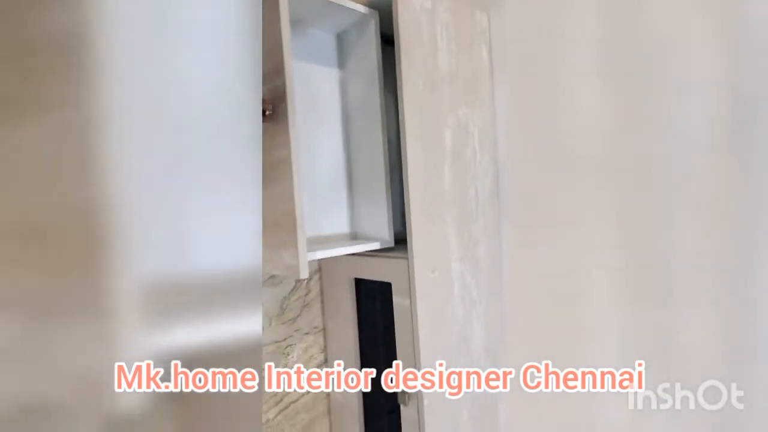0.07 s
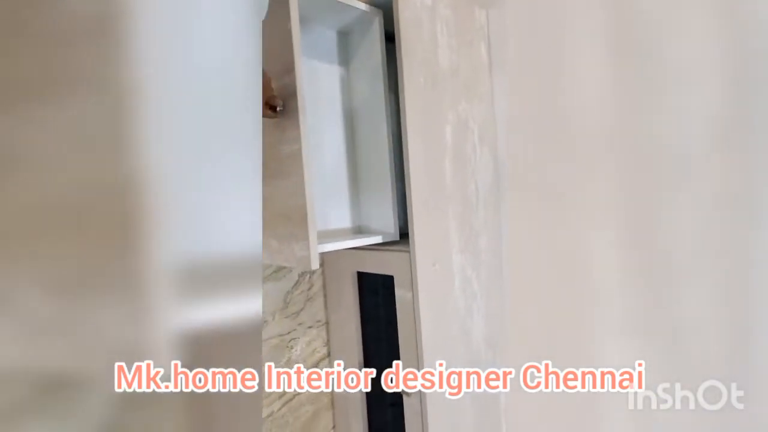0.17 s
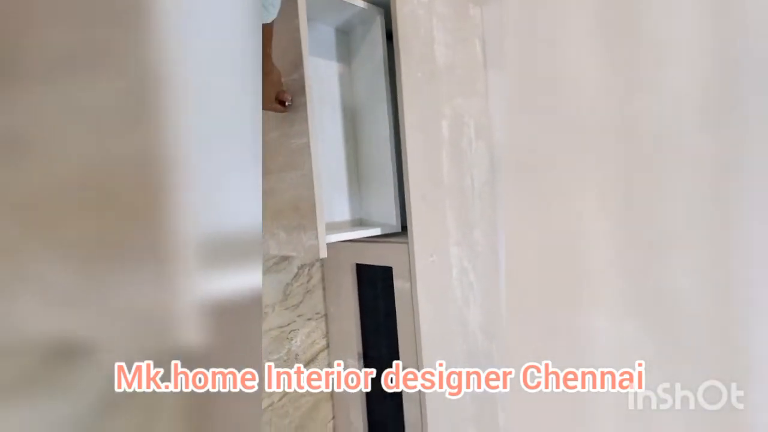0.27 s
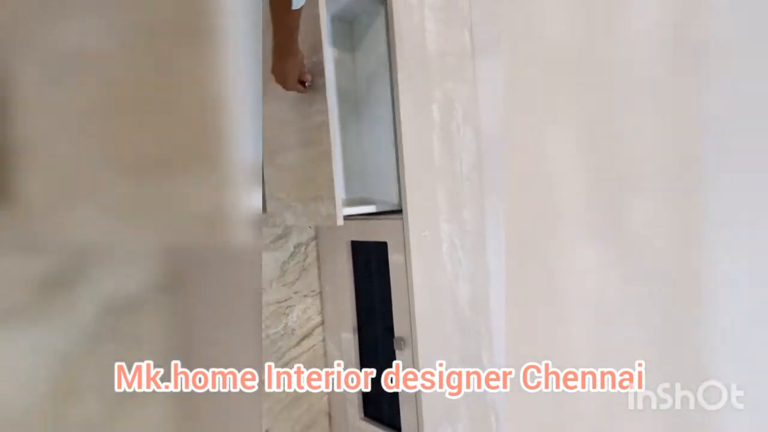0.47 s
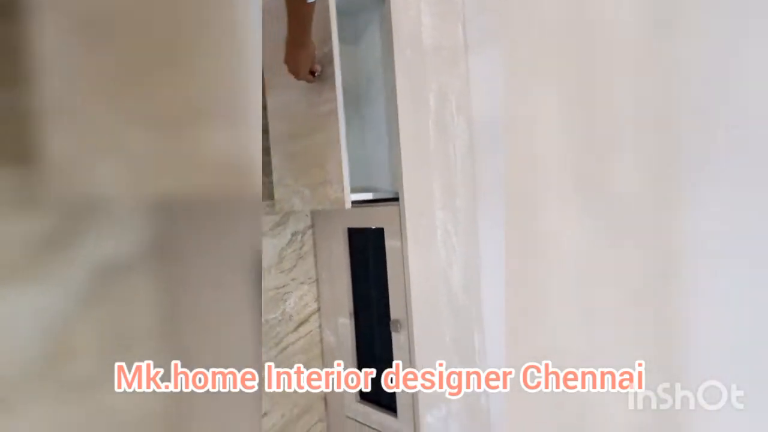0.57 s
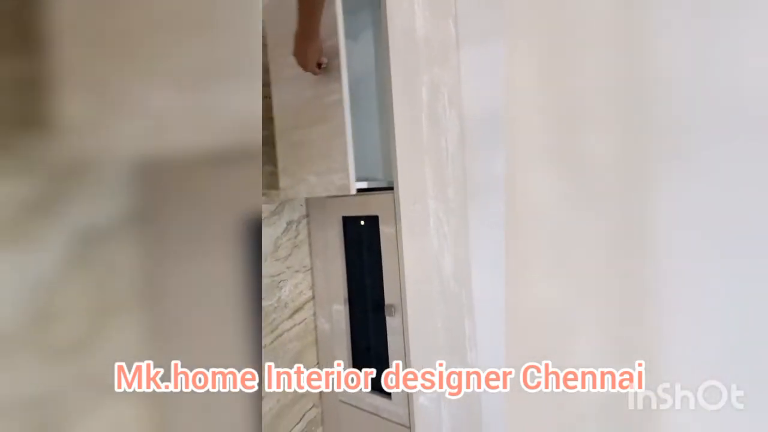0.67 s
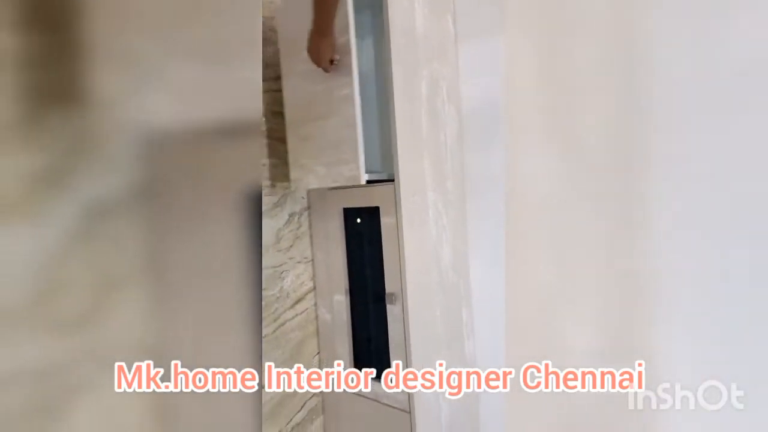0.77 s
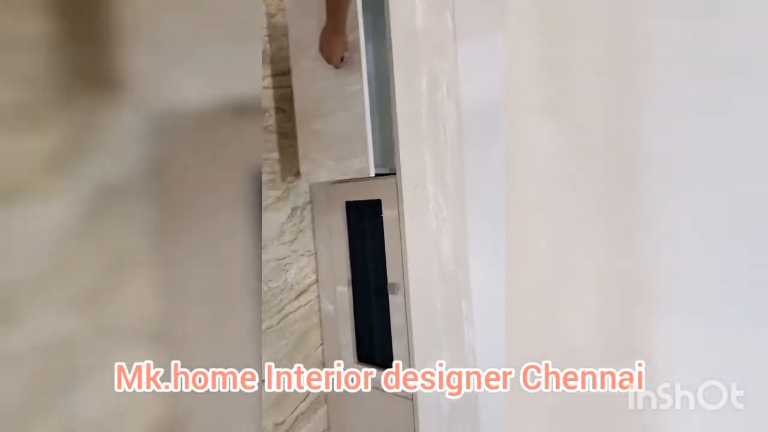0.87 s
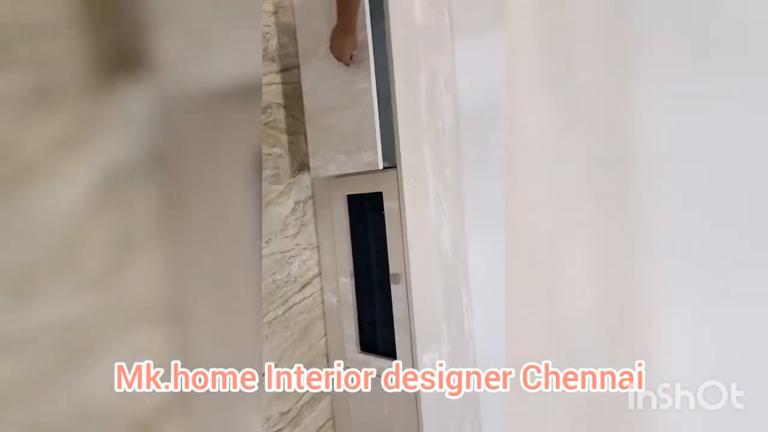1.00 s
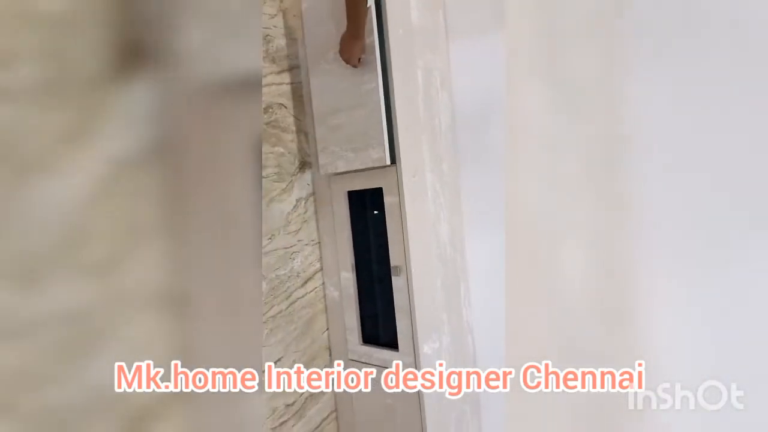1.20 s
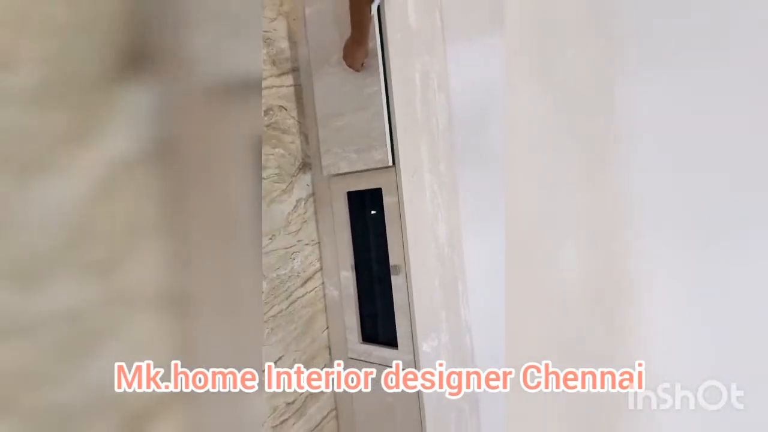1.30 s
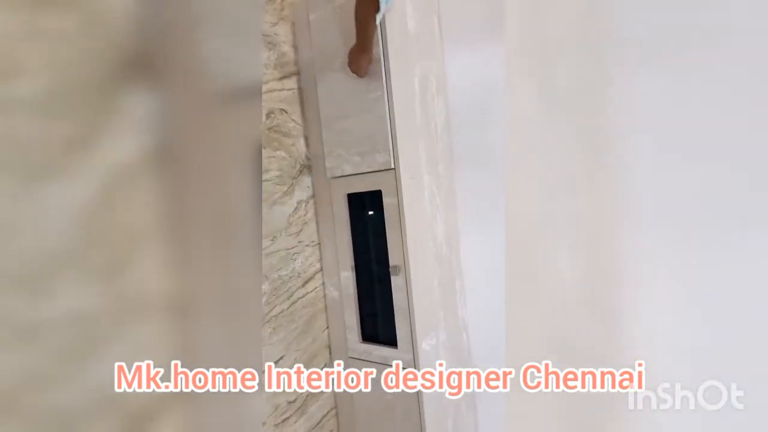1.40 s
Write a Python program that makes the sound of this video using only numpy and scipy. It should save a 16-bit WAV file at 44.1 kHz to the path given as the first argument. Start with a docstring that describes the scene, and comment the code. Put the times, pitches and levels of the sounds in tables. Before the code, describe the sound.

A drawer is pushed closed in a quiet kitchen. Its hollow rumble builds, with soft knocks and faint rustling from the rails, then it eases in, bumps gently at the stop and fades over a faint background hiss.

```python
"""A kitchen drawer is pushed shut on ball runners: it gathers speed, then a damper eases it in.
The balls roll over tiny bumps, which boom in the open box, rumble in the panels and rustle in the rails.
Soft knocks, deep thumps, faint pings and two light ticks come on the way, dull bumps as it seats.
The small room answers the knocks, pings and bumps, over a faint hiss."""
import sys
import numpy as np
from scipy import signal
from scipy.fft import rfft, irfft, next_fast_len
from scipy.io import wavfile
from scipy.ndimage import uniform_filter1d, map_coordinates

SR = 44100
rng = np.random.default_rng(int(sys.argv[2]) if len(sys.argv) > 2 else 0)


def pcm_store(signal):
    """Save signal as 16-bit PCM."""
    levels = np.round(np.clip(np.atleast_2d(signal), -1, 1) * 32767)
    wavfile.write(sys.argv[1], SR, levels.astype(np.int16).T)


N = 63945

# open box, lower and upper mode: centre_hz, width_hz, gain_db
BOX_MODES = [(131.5, 11, 0), (228.5, 9, -1)]
# box modes shifting as it enters the cabinet: time_s, lower_hz, upper_hz
BOX_GLIDE = [(.2, 130.3, 222), (.34, 132.1, 229.8), (.52, 131, 224.7), (0.619, 141, 230.7),
             (.7, 130.3, 227.2), (.83, 128.9, 229.8), (.92, 121, 231.7), (1.05, 130.2, 223.8)]
# envelopes of the two box modes: time_s, level_db
BOX_LOWER_LEVEL = [(0, -61), (.19, -64), (.225, -45.5), (.26, -43.5), (.292, -56), (.332, -41.5),
                   (.42, -70), (.48, -49), (.545, -39.5), (.575, -55), (.612, -30), (.66, -55), (.695, -32),
                   (.76, -36.5), (.795, -43), (.825, -35.5), (.89, -42.5), (.92, -35.5), (.965, -40.5),
                   (1.05, -39.5), (1.13, -52.5), (1.175, -53), (1.21, -55), (1.45, -66)]
BOX_UPPER_LEVEL = [(0, -82), (.085, -52.5), (.125, -57), (.15, -48.5), (.19, -51), (.215, -47), (.258, -44),
                   (.286, -66), (.318, -43.5), (.405, -44), (.45, -60), (.49, -38.5), (.56, -39.5),
                   (.63, -35), (.7, -38), (.75, -49), (.778, -37), (.826, -33), (.856, -62), (.9, -39),
                   (.96, -61), (.985, -38.5), (1.1, -50.5), (1.45, -67)]
# panel modes: centre_hz, width_hz, gain_db
PANEL_MODES = [(208.3, 7.8, 5.5), (291.3, 8.4, 3.5), (328, 55, -2), (354.3, 13.4, 0), (402.2, 5, -3),
               (428.6, 26, 1.5), (476, 9.6, -6), (545.8, 27.5, -3), (631.3, 12, -4), (725, 9, -7),
               (749, 19, -15), (810, 21, -46), (1021, 17, -19), (1287, 8.9, -7.5), (1370, 23, -20)]
# dense panel rumble: freq_hz, relative_db
RUMBLE_SPECTRUM = [(25, -39), (50, -44), (78, -14.5), (105, -7.5), (135, -4), (180, 1), (230, -2.5),
                   (300, 1), (450, -5), (700, -17), (1100, -26), (1600, -36), (3000, -44), (8000, -68)]
# rumble below and above the crossover: time_s, level_db
RUMBLE_LOW_LEVEL = [(0, -68), (.06, -56.5), (.15, -51.5), (.24, -53), (.285, -53), (.345, -61), (.385, -43),
                    (.53, -41), (.565, -36), (.67, -41), (.74, -39), (.805, -37), (.835, -36.5),
                    (.9, -36.5), (.96, -40), (.995, -34.5), (1.08, -40), (1.12, -44.5), (1.215, -45.5),
                    (1.275, -51.5), (1.45, -52)]
RUMBLE_HIGH_LEVEL = [(0, -67.5), (.14, -57), (.21, -60.5), (.33, -57.5), (.4, -52), (.45, -48.5),
                     (.53, -47.5), (.58, -43.5), (.68, -41.5), (.78, -40.5), (.865, -39.5), (.89, -42),
                     (.925, -39.5), (.96, -43), (1.0, -41), (1.06, -41.5), (1.2, -47.5), (1.3, -52),
                     (1.45, -56)]
# stereo image of box and panels: freq_hz, correlation
BODY_CORRELATION = [(60, 0.94), (150, 0.96), (280, 0.92), (500, 0.64), (1000, 0.29), (2200, -0.57),
                    (4500, 0.59), (10000, 1)]

# rail rustle: freq_hz, relative_db
RAIL_SPECTRUM = [(500, -31), (1400, -6.5), (1950, 8.5), (2500, 0.5), (3200, -6.5), (4200, -10), (5200, -12),
                 (7000, -11), (9000, -38), (15000, -24)]
# rustle envelope: time_s, relative_db
RAIL_LEVEL = [(0, -68.5), (.1, -64.5), (.3, -61.5), (.47, -60.5), (.555, -56.5), (.578, -55.5),
              (.615, -56.5), (.66, -56), (.78, -55), (.8, -54), (.98, -54.5), (1.12, -59.5), (1.27, -62),
              (1.45, -61.5)]
# stereo image of rails and damper: freq_hz, correlation
RAIL_CORRELATION = [(1000, -0.19), (2200, 0.18), (4500, -0.5), (10000, 0.27)]
# rustle balance: freq_hz, left_minus_right_db
RAIL_BALANCE = [(1000, -6), (2000, -4), (4000, -19.5), (9000, -1)]
# damper rasp: freq_hz, relative_db
DAMPER_SPECTRUM = [(900, -24), (1400, -8), (1900, 3), (2250, 6), (2700, 1), (3200, -12), (4500, -33),
                   (8000, -25.5)]

# runner knocks: start_s, peak_db, pitch_hz
RUNNER_KNOCKS = [(0.209, -41.5, 173), (.6, -30.5, 275), (0.62, -24.5, 245), (.668, -27, 342.2),
                 (.711, -29.5, 327), (0.795, -24.5, 314), (0.824, -29, 130), (1.203, -36, 290),
                 (1.352, -46, 110)]
# bumps at the stop: start_s, peak_db
SEAT_BUMPS = [(.975, -27), (.990, -24.5), (1.017, -27.5), (1.036, -37)]
# modes of the seating drawer: centre_hz, width_hz, gain_db
SEATING_MODES = [(130, 22, 12), (219.6, 33, 10), (328.2, 43, 0), (400, 30, -1), (460, 27, 7), (555, 27, -2)]
# damped rings of drawer front, cabinet and rail: start_s, level_db, pitch_hz
DRAWER_FRONT_RINGS = [(.905, -32, 547.5), (.912, -48, 645), (1.055, -40.5, 639.4)]
CABINET_THUMPS = [(.215, -48, 88), (0.459, -41, 91), (.53, -54, 86.5), (.74, -50, 87), (.812, -41, 81),
                  (.935, -40.5, 88), (1.333, -43, 80.4)]
RAIL_PINGS = [(.572, -38, 1037), (.578, -52, 2500), (.628, -50, 1050), (.762, -37, 855), (1.032, -47, 1120)]
# ticks of the fittings: start_s, level_db
FITTING_TICKS = [(0.266, -56), (0.789, -63)]
# tick noise: freq_hz, relative_db
TICK_SPECTRUM = [(300, -34), (1500, 8.5), (2500, 5.5), (4500, 3.5), (9000, 3.5), (15500, 1)]

# room decay: freq_hz, t60_s
ROOM_DECAY = [(100, 0.13), (1000, 0.12), (10000, 0.39)]
# room tone: freq_hz, relative_db
ROOM_SPECTRUM = [(25, -2.5), (50, -7), (80, 12.5), (170, 0.5), (330, 19), (450, -8.5), (700, 6),
                 (1300, -5.5), (2000, -4), (3200, -15.5), (6000, -20.5), (8200, -21.5), (12000, -20.5),
                 (15500, -21.5)]
# room tone envelope: time_s, level_db
ROOM_LEVEL = [(0, -61), (.1, -57.5), (.3, -53), (.8, -52), (1.2, -55), (1.45, -52.5)]
# stereo image of room tone and ticks: freq_hz, correlation
ROOM_CORRELATION = [(60, 0.92), (300, 1), (1000, 0.31), (4000, 0.078), (8000, 1), (14000, 0.5)]

BODY_PAN_DB = -0.54  # left minus right
TIME_S = np.arange(N) / SR


def box_boom():
    """Rolling balls drive the two low modes of the open box."""
    time_s, lower_hz, upper_hz = np.transpose(BOX_GLIDE)
    lower = box_hum(BOX_MODES[0], np.interp(TIME_S, time_s, lower_hz))
    upper = box_hum(BOX_MODES[1], np.interp(TIME_S, time_s, upper_hz))
    return level(BOX_LOWER_LEVEL) * lower + level(BOX_UPPER_LEVEL) * upper


def box_hum(mode, pitch_hz, drift_share=0.013, noise_share=0.13, flutter_db=1.3):
    """One box mode kept humming by the balls: a drifting, fluttering, slightly rough tone."""
    drifting_hz = pitch_hz * (1 + drift_share * wobble(knots_per_s=22))
    cycles = rng.random() + np.cumsum(drifting_hz) / SR
    hum = np.sqrt(2) * np.sin(2 * np.pi * cycles) * panned(BODY_PAN_DB)
    ring = ringing(contacts(grit=0.33), [mode], low_hz=73)
    rough = spread(ringing(ring, [mode], low_hz=73), BODY_CORRELATION, BODY_PAN_DB)
    tone = np.sqrt(1 - noise_share) * hum + np.sqrt(noise_share) * rough
    return amp(flutter_db * wobble(knots_per_s=36)) * even(tone, window_s=0.037)


def panel_rumble(modes_db=-3, dense_db=-1.5, crossover_hz=359):
    """Drawer front and cabinet: clear modes over a dense rumble, brighter with speed."""
    ring = spread(ringing(contacts(grit=0.22), PANEL_MODES, low_hz=168), BODY_CORRELATION, BODY_PAN_DB)
    dense = spread(coloured(contacts(grit=0.26), RUMBLE_SPECTRUM), BODY_CORRELATION, BODY_PAN_DB)
    rumble = amp(modes_db) * ring + amp(dense_db) * dense
    low = filtered(rumble, lambda hz: 1 / (1 + (hz / crossover_hz) ** 12))
    return (level(RUMBLE_LOW_LEVEL) * even(low, window_s=0.0346)
            + level(RUMBLE_HIGH_LEVEL) * even(rumble - low, window_s=0.043))


def rail_rustle(gain_db=-2):
    """Balls rustle in the steel rails, off to the right."""
    rustle = spread(coloured(contacts(grit=0.14), RAIL_SPECTRUM), RAIL_CORRELATION, pan_db=0)
    rustle = filtered(rustle, lambda hz: panned(along(RAIL_BALANCE, hz)))
    return amp(gain_db) * level(RAIL_LEVEL) * unit(rustle)


def contacts(grit, hits_per_s=2600):
    """Ball force: smooth rolling noise plus tiny impacts with power share grit."""
    hits = (rng.random((2, N)) < hits_per_s / SR) * rng.standard_normal((2, N))
    return np.sqrt(grit) * unit(hits) + np.sqrt(1 - grit) * rng.standard_normal((2, N))


def damper_rasp(start_s=0.79, attack_s=0.0017, hold_s=0.2, hold_db=-56, fade_db_per_s=50):
    """The damper catches the drawer with a bite and rasps until it has slowed."""
    age_s = since(start_s)
    bite_db = 9 * np.exp(-age_s / 0.023)
    fade_db = fade_db_per_s * since(start_s + hold_s)
    envelope = (1 - np.exp(-age_s / attack_s)) * amp(hold_db + bite_db - fade_db)
    rasp = coloured(contacts(grit=0.13), DAMPER_SPECTRUM)
    return envelope * spread(rasp, RAIL_CORRELATION, pan_db=-6)


def runner_knocks(width_hz=61, body_db=-14):
    """Larger bumps in the runners: each rings its own spot and jolts box and panels."""
    return sum(thud([(hz, width_hz, 0)], start_s, db)
               + thud(BOX_MODES + PANEL_MODES, start_s, db + body_db)
               for start_s, db, hz in RUNNER_KNOCKS)


def seating():
    """The drawer front rings as it slows, then meets its soft stop in a run of dull bumps."""
    front = struck(DRAWER_FRONT_RINGS, t60_s=0.23, attack_s=0.0095)
    return front + sum(thud(SEATING_MODES, start_s, db) for start_s, db in SEAT_BUMPS)


def cabinet_thumps():
    """The cabinet takes the drawer's weight with a soft, deep ring."""
    return struck(CABINET_THUMPS, t60_s=0.33, attack_s=0.015)


def rail_pings():
    """The steel rail rings briefly as balls pass a rough spot."""
    return struck(RAIL_PINGS, t60_s=0.079, attack_s=0.0049)


def fitting_ticks():
    """Bright ticks of the fittings: noise bursts with a room-like decay."""
    envelope = sum(decay(start_s, db, t60_s=0.13, attack_s=0.0018) for start_s, db in FITTING_TICKS)
    noise = coloured(rng.standard_normal((2, N)), TICK_SPECTRUM)
    return envelope * spread(noise, ROOM_CORRELATION, pan_db=-10)


def room_reverb(x):
    """Short kitchen tail, each frequency dying at its own rate."""
    hz, time_s, bins = signal.stft(rng.standard_normal((2, SR // 2)), SR, nperseg=256)
    fade = amp(-60 * time_s / along(ROOM_DECAY, hz)[:, None])
    _, tail = signal.istft(bins * fade, SR, nperseg=256)
    return signal.fftconvolve(x[None], tail / np.linalg.norm(tail[0]), axes=1)[:, :N]


def room_tone():
    """Low room noise and faint hiss."""
    noise = coloured(rng.standard_normal((2, N)), ROOM_SPECTRUM)
    return level(ROOM_LEVEL) * spread(noise, ROOM_CORRELATION, pan_db=-3.5)


def thud(modes, start_s, peak_db, cutoff_hz=520):
    """One padded blow on a set of modes."""
    push = signal.sosfilt(signal.butter(4, cutoff_hz, fs=SR, output="sos"), signal.unit_impulse(N))
    ring = ringing(push, modes, low_hz=147)
    return amp(peak_db) * np.pad(ring / np.abs(ring).max(), (round(start_s * SR), 0))[:N]


def struck(events, t60_s, attack_s):
    """One damped sine per event."""
    return sum(decay(start_s, db, t60_s, attack_s) * np.sin(2 * np.pi * hz * since(start_s))
               for start_s, db, hz in events)


def ringing(x, modes, low_hz):
    """x through modes that radiate little below low_hz or far above the last mode."""
    def response(hz):
        ring = sum(amp(db) * 1j * hz * width_hz / (centre_hz ** 2 - hz ** 2 + 1j * hz * width_hz)
                   for centre_hz, width_hz, db in modes)
        highpass = (1j * hz / (low_hz + 1j * hz)) ** 2
        lowpass = 1 / (1 + 1j * hz / (2 * modes[-1][0])) ** 2
        return ring * highpass * lowpass
    return filtered(x, response)


def decay(start_s, db, t60_s, attack_s):
    """Envelope: soft rise, exponential fall."""
    age_s = since(start_s)
    return amp(db - 60 * age_s / t60_s) * (1 - np.exp(-age_s / attack_s))


def since(start_s):
    """Seconds after start_s, zero before."""
    return np.maximum(TIME_S - start_s, 0)


def wobble(knots_per_s):
    """Smooth random curve."""
    return map_coordinates(rng.standard_normal(100), [TIME_S * knots_per_s], mode="mirror")


def spread(pair, correlation, pan_db):
    """Two unrelated signals to left and right, rms 1."""
    def weights(hz):
        angle = np.arccos(np.clip(along(correlation, hz), -1, 1)) / 2
        return np.array([np.cos(angle), np.sin(angle)])
    mid, side = filtered(pair, weights)
    return unit(np.array([mid + side, mid - side]) * panned(pan_db))


def panned(pan_db):
    """Left and right gains; positive is left."""
    return amp(np.array([[1], [-1]]) * pan_db / 2)


def even(x, window_s):
    """x with slow swells levelled."""
    power = uniform_filter1d(np.mean(x ** 2, axis=0), int(window_s * SR))
    return x / np.sqrt(np.abs(power) + 1e-9)


def coloured(x, spectrum):
    """x shaped by (freq_hz, gain_db) points."""
    return filtered(x, lambda hz: amp(along(spectrum, hz)))


def filtered(x, response):
    """x through a frequency response."""
    size = next_fast_len(N + SR // 2)
    return irfft(rfft(x, size) * response(np.fft.rfftfreq(size, 1 / SR)), size)[..., :N]


def along(points, hz):
    """(freq_hz, value) points read on a log axis."""
    freq_hz, values = np.transpose(points)
    return np.interp(np.log(hz + 1), np.log(freq_hz + 1), values)


def level(rows):
    """Gain per sample from (time_s, level_db) rows."""
    return amp(np.interp(TIME_S, *np.transpose(rows)))


def unit(x):
    """x at rms 1."""
    return x / np.sqrt(np.mean(x ** 2) + 1e-20)


def amp(db):
    """Decibels to gain."""
    return 10 ** (np.asarray(db) / 20)


def scene(reverb_db=-11):
    """The closing drawer in its room."""
    bumps = runner_knocks() + seating() + rail_pings()
    rolling = box_boom() + panel_rumble() + rail_rustle() + damper_rasp()
    reverb = amp(reverb_db) * room_reverb(bumps)
    return rolling + cabinet_thumps() + bumps + reverb + fitting_ticks() + room_tone()


def record(dry, low_cut_hz=58, shelf_db=-6, top_hz=15700):
    """Microphone: deep bass shelved down, nothing above top_hz."""
    def response(hz):
        highpass = 1 / np.sqrt(1 + (low_cut_hz / (hz + 1)) ** 10)
        return np.maximum(highpass, amp(shelf_db)) * (hz < top_hz)
    return filtered(dry, response)


dry = scene()
out = record(dry)
pcm_store(out)
```